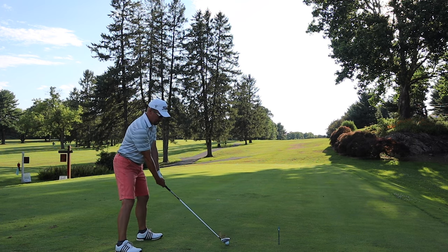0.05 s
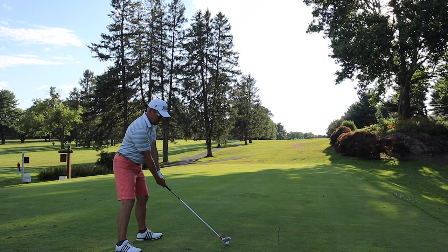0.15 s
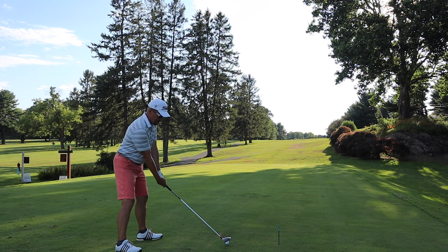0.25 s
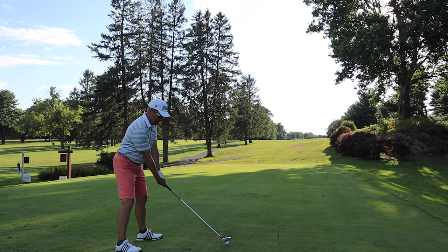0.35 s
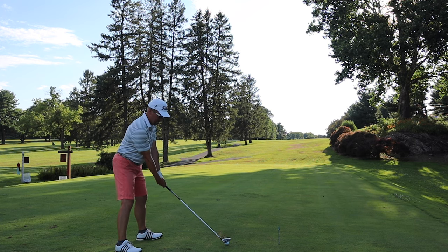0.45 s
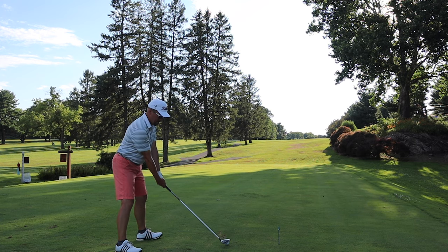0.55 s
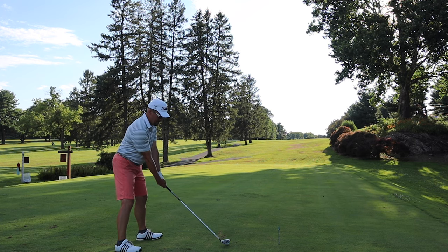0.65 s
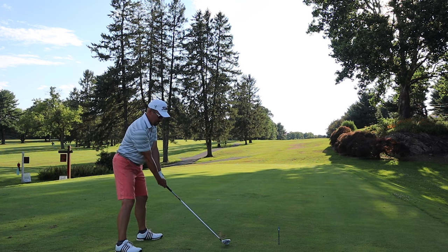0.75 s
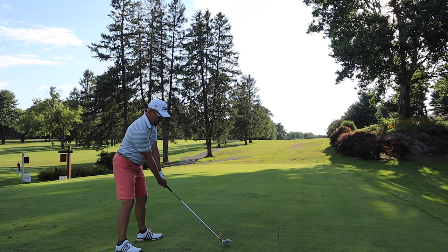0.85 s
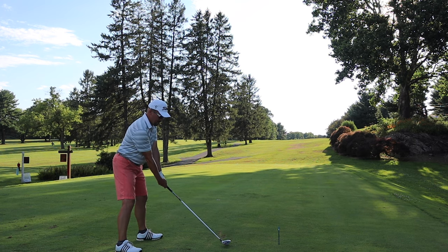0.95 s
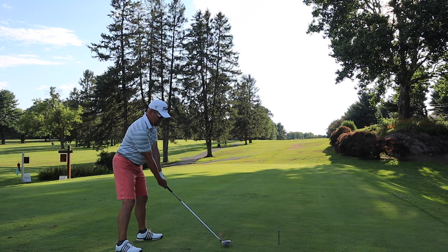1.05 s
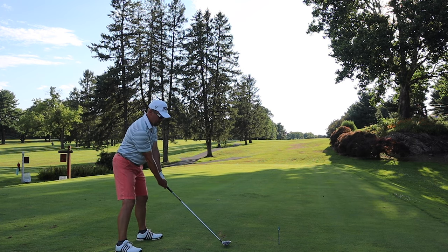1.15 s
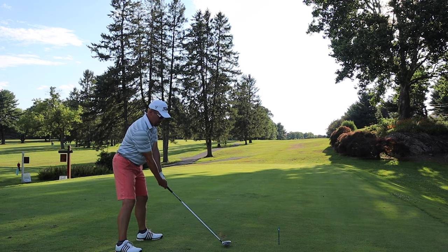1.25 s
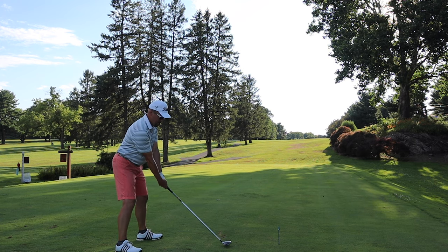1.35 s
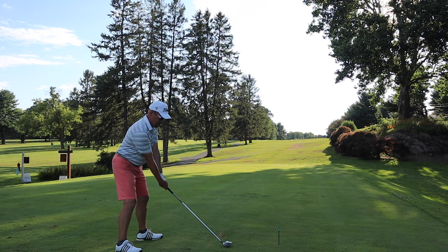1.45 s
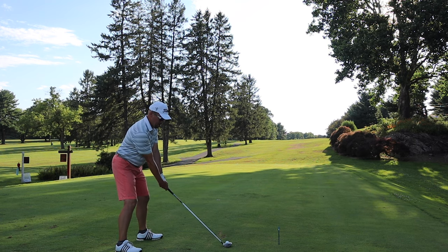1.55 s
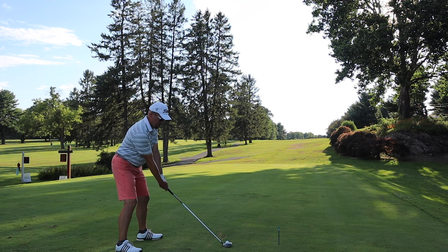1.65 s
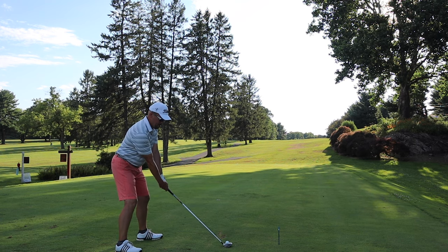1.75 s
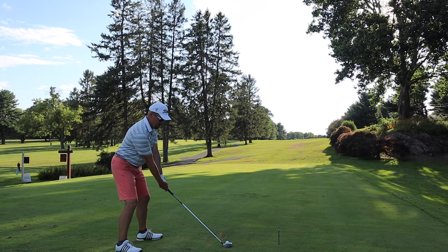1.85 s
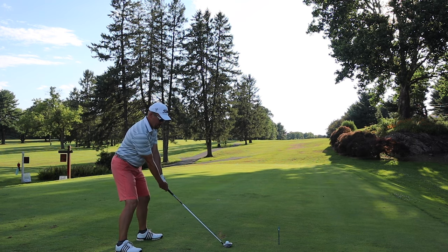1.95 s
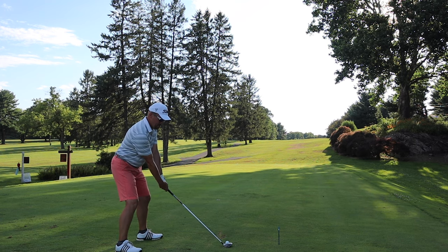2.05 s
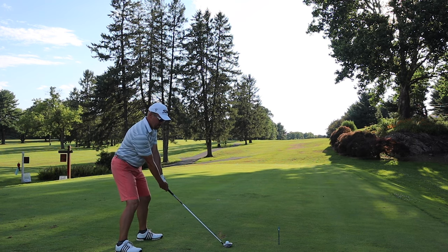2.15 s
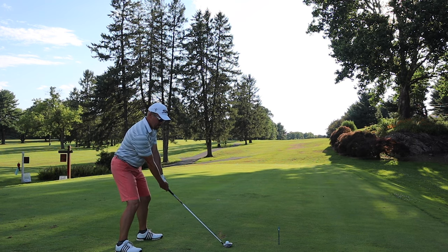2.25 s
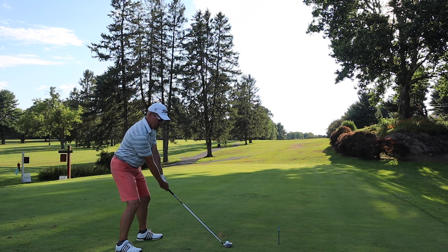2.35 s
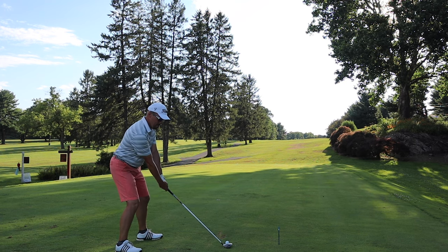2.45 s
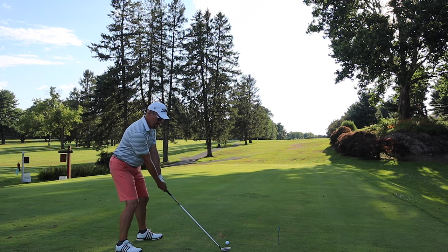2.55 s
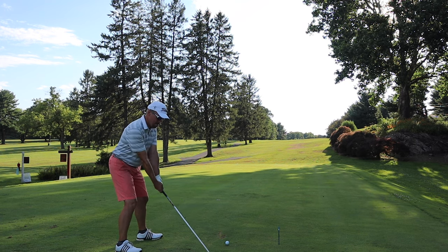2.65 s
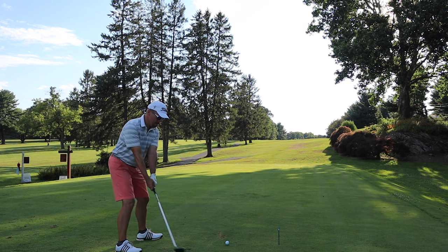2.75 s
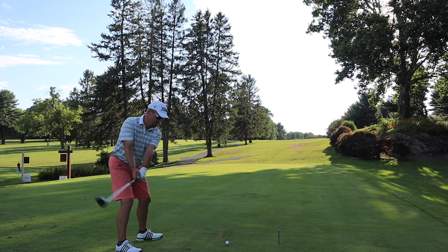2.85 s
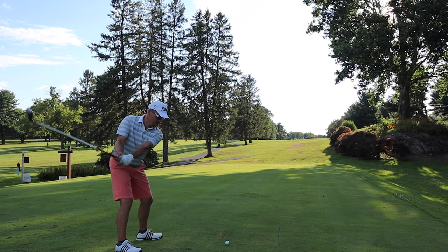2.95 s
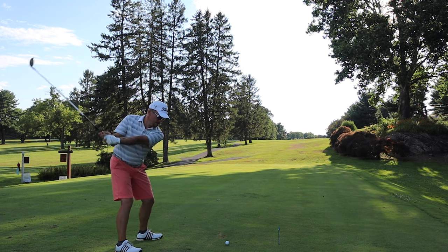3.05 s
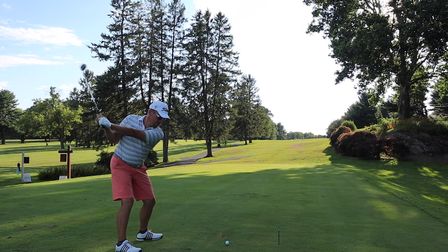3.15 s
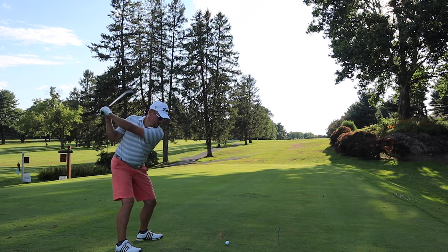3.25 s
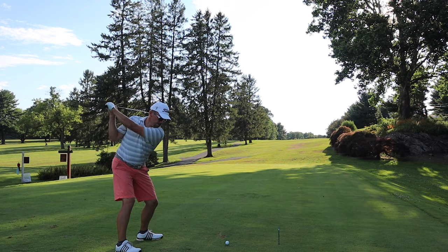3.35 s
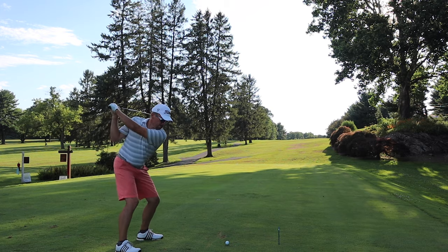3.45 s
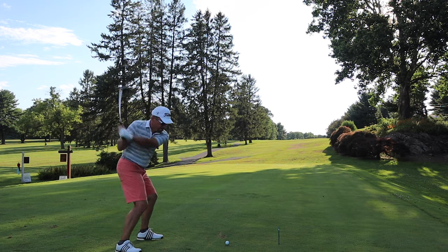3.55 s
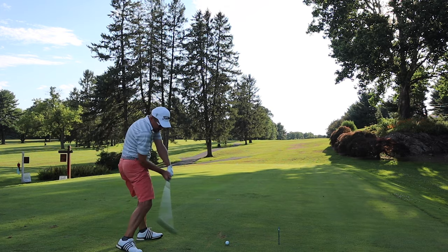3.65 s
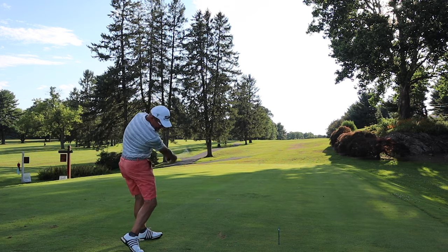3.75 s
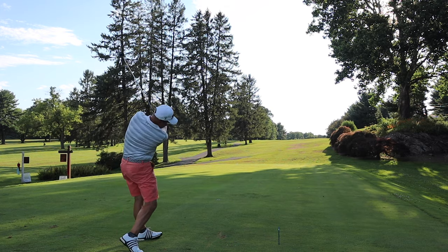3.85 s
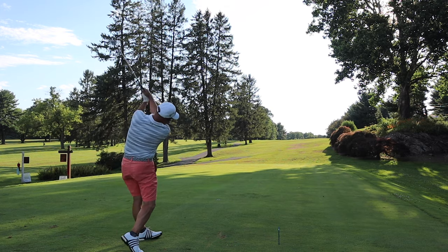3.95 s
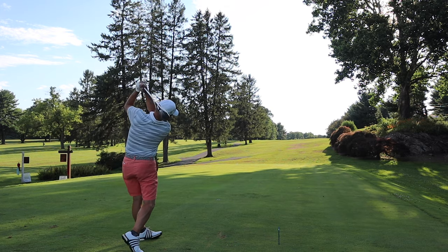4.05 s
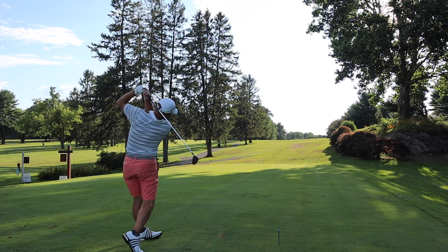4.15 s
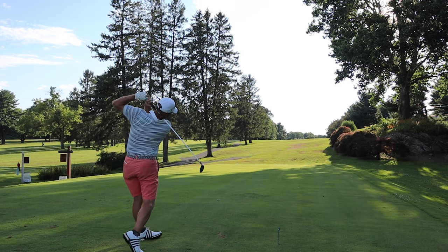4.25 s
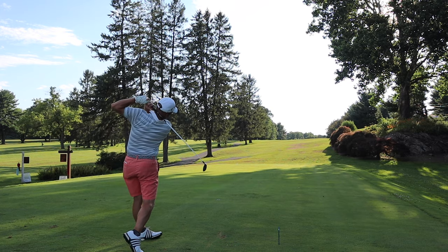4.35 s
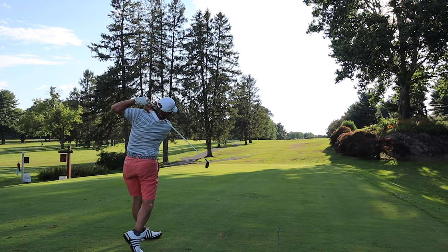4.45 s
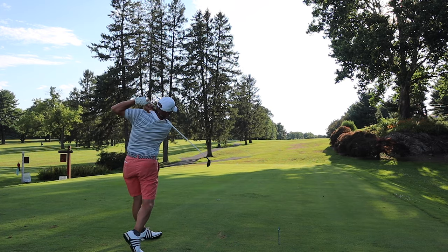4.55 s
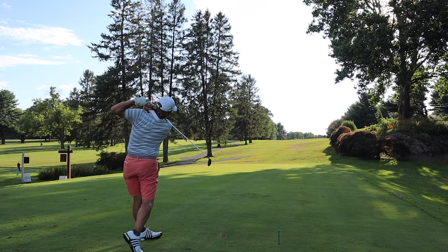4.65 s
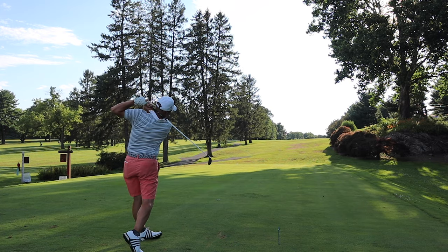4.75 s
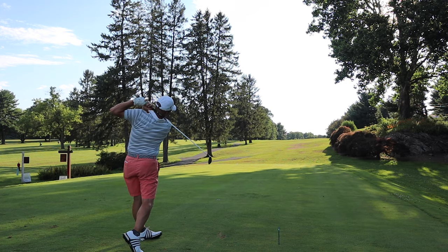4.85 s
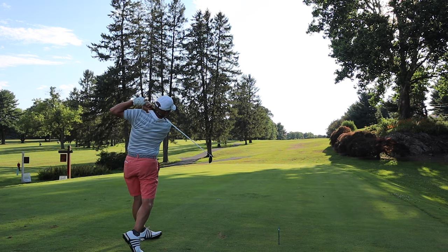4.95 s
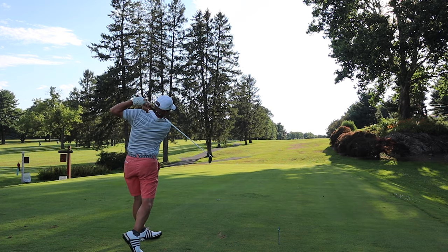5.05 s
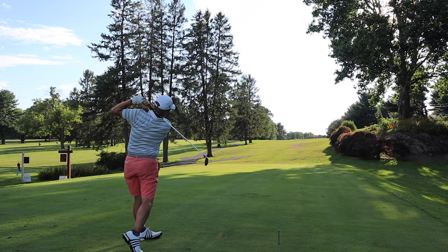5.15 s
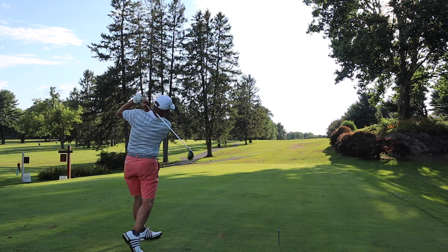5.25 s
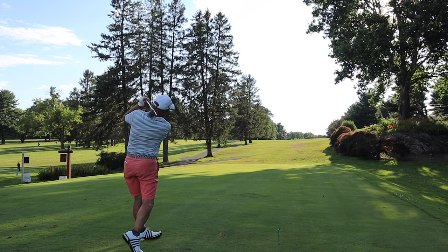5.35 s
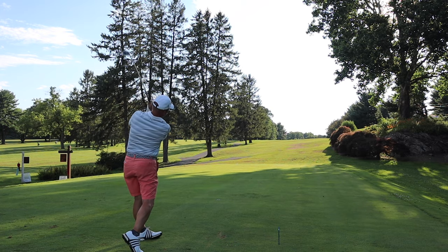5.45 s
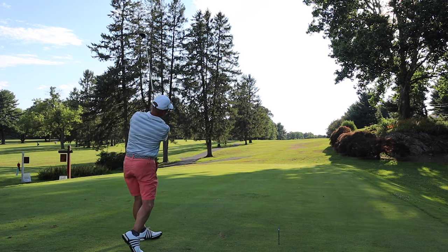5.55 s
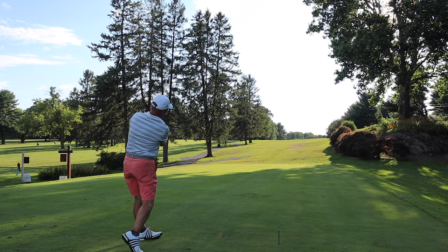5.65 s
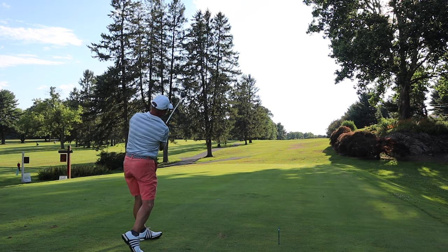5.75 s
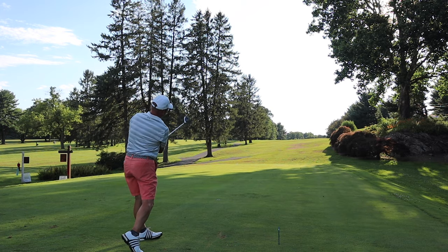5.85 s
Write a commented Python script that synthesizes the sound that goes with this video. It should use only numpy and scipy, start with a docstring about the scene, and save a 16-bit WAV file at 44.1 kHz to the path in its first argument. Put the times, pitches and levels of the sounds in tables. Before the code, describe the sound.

Soft whistling birds over a far low hum, then a quick whoosh and a bright metallic golf drive with a short hissy return from trees.

```python
"""Golf drive among trees

A quiet, tree-lined course, one microphone behind the tee, a golfer driving a ball off it.
The club swishes down as vortex tone, hiss and low wake; its hollow metal head rings against the ball.
Two stands of trees, nearer and farther, throw the crack back as coloured noise.
Small birds sing gliding whistles over a distant hum of traffic made of noise, with one far motor.
A limiter ducks briefly after the blow."""
import sys
import numpy as np
from scipy import signal
from scipy.fft import rfft, irfft
from scipy.io import wavfile
from scipy.ndimage import uniform_filter1d, minimum_filter1d

SR = 44100
rng = np.random.default_rng(int(sys.argv[2]) if len(sys.argv) > 2 else 0)


def store_wav(level_fs):
    """Save 16-bit WAV to argv[1]."""
    pcm = np.round(np.clip(np.atleast_2d(level_fs), -1, 1) * 32767)
    wavfile.write(sys.argv[1], SR, pcm.T.astype(np.int16))


N = 260631
T = np.arange(N) / SR  # time [s]
STRIKE_S = 3.8078  # the club meets the ball


def amp(db):
    """Decibels to gain."""
    return 10 ** (np.asarray(db) / 20)


def evened(x):
    """Scales to rms 1."""
    return x / np.sqrt(np.mean(x ** 2) + 1e-20)


def noise(points):
    """Noise shaped by a spectrum of (frequency [Hz], level [dB]) points; rms 1."""
    hz, db = np.transpose(points)
    log_hz = np.log(np.fft.rfftfreq(N, 1 / SR) + 1)
    gain = amp(np.interp(log_hz, np.log(hz + 1), db))
    return evened(irfft(rfft(rng.standard_normal(N)) * gain, N))


def drift(hz):
    """Slow chance up to about hz; rms 1."""
    gain = np.exp(-(np.fft.rfftfreq(N, 1 / SR) / hz) ** 2)
    return evened(irfft(rfft(rng.standard_normal(N)) * gain, N))


def level(s, db):
    """Gain along a dB curve, silent outside it."""
    return amp(np.interp(T, s, db)) * (T >= s[0]) * (T <= s[-1])


def turn(s, hz):
    """Running phase of a pitch curve."""
    return 2 * np.pi * np.cumsum(np.interp(T, s, hz)) / SR


def dying(s, t60):
    """Exponential decay that starts at s and falls 60 dB in t60 seconds."""
    return (T >= s) * np.exp(-np.log(1000) * np.maximum(T - s, 0) / t60)


def swell(full_s, hold_s, db, rise_db_per_s, fall_db_per_s):
    """Gain that rises to db, holds and falls away."""
    early = np.maximum(full_s - T, 0)
    late = np.maximum(T - full_s - hold_s, 0)
    return amp(db - rise_db_per_s * early - fall_db_per_s * late)


def ring(s, modes, contact, low_cut_hz=135):
    """Modes set ringing at s by a push that lasts contact seconds; small things radiate little bass."""
    start, t = round(s * SR), np.arange(SR // 4) / SR
    tone = np.zeros(len(t))
    for hz, db, t60 in modes:
        tone += amp(db) * np.exp(-np.log(1000) * t / t60) * np.sin(2 * np.pi * hz * t)
    push = np.sin(np.pi / 2 * np.minimum(t / contact, 1)) ** 2
    out = np.zeros(N)
    out[start:start + len(t)] = -tone * push
    return signal.sosfilt(signal.butter(4, low_cut_hz, "highpass", fs=SR, output="sos"), out)


def add(mix, s, sound):
    """Mixes a sound in at s."""
    part = mix[round(s * SR):][:len(sound)]
    part += sound[:len(part)]


# a far motor gathering speed: (time [s], pitch [Hz], level [dB])
FAR_MOTOR = [(1.6, 158, -74), (2.05, 168, -66.5), (2.45, 188, -73), (2.85, 201, -63), (3.15, 207, -67),
             (3.4, 209, -88)]
# spectrum of the far traffic and leaves: (frequency [Hz], level [dB])
AIR_COLOUR = [(15, -69.5), (25, -35), (47, -18), (102, -0.5), (200, -3.5), (255, -9), (291, -9), (361, -12),
              (769, -10), (1820, -17), (2810, -25), (3220, -24.5), (3780, -29), (6850, -32), (15800, -40)]


def distance(air_db=-59.5, swell_db=-0.13):
    """Far traffic and leaves, a gently swelling noise, with one motor tone rising out of the hum."""
    s, hz, db = np.transpose(FAR_MOTOR)
    motor = np.sqrt(2) * level(s, db) * np.sin(turn(s, hz))  # root 2: levels are rms
    motor *= amp(1.5 * drift(11))
    return amp(air_db) * noise(AIR_COLOUR) * amp(swell_db * drift(5)) + motor


def slur(start, top_hz, loudest, db):
    """A whistle that sags ever faster and swells to one accent: start, pitch, gain."""
    length_s, drop, bend = .295, .135, 1.75  # drop: share of the pitch lost; bend: how late the fall comes
    accent_s, accent_db = .055, 10  # half width and height of the accent
    t = np.arange(0, length_s, 1 / SR)
    shape_db = accent_db * (np.exp(-((t - loudest) / accent_s) ** 2) - 1)
    hz = top_hz * (1 - drop * (t / length_s) ** bend)
    return start, hz, amp(db + shape_db) * signal.windows.tukey(len(t), .15)


def chip(start, length, first_hz, last_hz, db, bend=1.5):
    """A quick glide that levels off, under one arch of loudness: start, pitch, gain."""
    u = np.linspace(0, 1, round(length * SR))
    hz = last_hz + (first_hz - last_hz) * (1 - u) ** bend
    return start, hz, amp(db) * np.sin(np.pi * u)


def far_chirps(count=14, low_hz=3000, high_hz=4300, length_s=.06, most_glide=.12, db=-84):
    """Faint far chips scattered in time and pitch; most_glide is a share of the pitch."""
    when, height, glide = rng.random((count, 3)).T
    first_hz = low_hz + (high_hz - low_hz) * height ** 2  # squared: more of them low
    last_hz = first_hz * (1 + most_glide * (2 * glide - 1))
    return [chip(s, length_s, f, g, db) for s, f, g in zip(when * T[-1], first_hz, last_hz)]


# falling whistles of one kind of bird: (start [s], top pitch [Hz], loudest after [s], level [dB])
FALLING_WHISTLES = [(.395, 3510, .145, -70), (.82, 3390, .235, -64), (1.04, 3520, .18, -71),
                    (1.43, 3390, .19, -68), (3.97, 3500, .13, -66.5), (4.8, 3550, .21, -65)]
# short chips and lead-in notes: (start [s], length [s], first pitch [Hz], last pitch [Hz], level [dB])
SHORT_CHIPS = [(.035, .06, 4800, 4690, -79), (.495, .03, 6720, 6830, -73), (.572, .022, 6400, 6900, -71),
               (.615, .06, 4450, 4200, -76), (.67, .06, 4040, 4000, -79), (1.469, .019, 5100, 6480, -62),
               (1.483, .016, 7380, 7430, -65), (1.59, .06, 4850, 4780, -82), (1.68, .04, 5170, 5000, -81),
               (1.95, .05, 3350, 3650, -70), (2.245, .045, 1850, 2300, -73), (2.62, .045, 2950, 3400, -79),
               (2.95, .055, 3030, 3200, -76), (4.605, .055, 4050, 3660, -79),
               (4.665, .035, 4850, 4540, -80), (4.795, .06, 3480, 3560, -72),
               (5.485, .055, 2570, 2620, -78)]


def birds(waver=0.007, flutter_db=2.5, wet_db=-6.5, t60=0.65):
    """Near-pure gliding whistles, smeared by the foliage they pass through."""
    song, wobble = np.zeros(N), 1 + waver * drift(60)
    notes = [slur(*row) for row in FALLING_WHISTLES] + [chip(*row) for row in SHORT_CHIPS]
    for start, hz, gain in notes + far_chirps():
        wavering_hz = hz * np.interp(start + T[:len(hz)], T, wobble)
        add(song, start, gain * np.sin(2 * np.pi * np.cumsum(wavering_hz) / SR))
    song *= np.sqrt(2) * amp(flutter_db * drift(39))
    foliage = (rng.standard_normal(N) * dying(0.012, t60))[:SR]  # first return after 12 ms
    foliage /= np.linalg.norm(foliage)
    return song + amp(wet_db) * signal.fftconvolve(song, foliage)[:N]


# light ticks of club, shoes and clothes: (time [s], level [dB])
LIGHT_TICKS = [(1.2272, -53), (1.234, -55), (3.2765, -51), (3.5003, -57), (3.7143, -52), (5.5803, -57)]
# spectrum of the ticks: (frequency [Hz], level [dB])
TICK_SPECTRUM = [(500, 8), (2000, -5), (4000, -1), (8000, -6), (12000, -22), (16000, -16)]
# soft knocks as the golfer settles: (time [s], level [dB])
SOFT_KNOCKS = [(1.2276, -45), (1.2335, -44), (1.2475, -52)]
# what the knocks ring with: (frequency [Hz], level [dB], t60 [s])
KNOCK_RING = [(280, -9, 0.083), (341, -5.5, .085), (405, 2.5, .08), (542, -3.5, 0.052), (775, -9, 0.042),
              (1060, -4.5, 0.039), (1240, -14, 0.027)]


def stance(tick_t60=0.016):
    """Small sounds of the golfer by the tee: dry noise ticks and dull ringing knocks."""
    tick_gain = sum(amp(db) * dying(s, tick_t60) for s, db in LIGHT_TICKS)
    knocks = sum(amp(db) * ring(s, KNOCK_RING, contact=0.00066) for s, db in SOFT_KNOCKS)
    return tick_gain * noise(TICK_SPECTRUM) + knocks


# the crack thrown back by the nearer and the farther stand of trees:
# (full from [s], hold [s], level [dB], rise [dB/s], fall [dB/s])
NEAR_RETURN = (3.9, .01, -42, 160, 260)
FAR_RETURN = (4.014, .058, -48.5, 430, 175)
# spectra of the near and far returns: (frequency [Hz], level [dB])
NEAR_SPECTRUM = [(1180, -49.5), (2000, -19.5), (2890, -13.5), (3020, -8.5), (3800, -4.5), (4670, -5),
                 (5500, -1), (6870, -2.5), (8150, 2.5), (9430, -6), (10300, -1.5), (11800, -9.5),
                 (15500, -38.5)]
FAR_SPECTRUM = [(1000, -19), (1700, -10.5), (2500, -16), (3500, -5), (4000, 2), (4500, -3.5), (5200, -4),
                (6250, 1.5), (7100, -10), (8500, -1.5), (9400, -10), (9900, -22), (11500, -24),
                (14000, -40)]


def trees(flicker_db=1.5):
    """Countless trunks and branches each return a tiny copy of the crack; the far ones lose more treble."""
    grass = amp(-49) * dying(STRIKE_S, t60=.6)  # thin scatter from close by
    woods = amp(-62) * dying(STRIKE_S, t60=1.9)  # thin scatter from all round
    near = np.hypot(swell(*NEAR_RETURN), grass) * noise(NEAR_SPECTRUM)
    far = np.hypot(swell(*FAR_RETURN), woods) * noise(FAR_SPECTRUM)
    return (near + far) * (T >= STRIKE_S) * amp(flicker_db * drift(120))


# low eddies behind the head, then turbulence round it: (frequency [Hz], level [dB])
WAKE_SPECTRUM = [(60, -39.5), (150, -8), (300, -5.5), (450, 3), (600, -6.5), (1000, -24), (3000, -68.5)]
HISS_SPECTRUM = [(600, -21.5), (1100, 1.5), (1700, -1), (2700, -7.5), (3600, -3), (4800, -6.5), (6300, -15),
                 (7400, -10.5), (8700, -8.5), (9900, -23), (13500, -22.5), (15500, -31)]
# loudness of the shaft and wake, then of the hiss:
# (full from [s], hold [s], level [dB], rise [dB/s], fall [dB/s])
SHAFT_LOUDNESS = (3.759, .046, -28, 790, 1450)
HISS_LOUDNESS = (3.76, .042, -37.8, 760, 1000)


def swish(width_hz=110, steady=.5, skirt_db=-6.0, skirt_hz=220, wake_db=-12.5):
    """The shaft sheds vortices at a pitch that follows its speed; the head adds hiss and a low wake."""
    slow_hz, fast_hz = 450, 765
    fastest_s, swing_width_s = 3.785, .042
    speed = np.exp(-((T - fastest_s) / swing_width_s) ** 2)
    phase = turn(T, slow_hz + (fast_hz - slow_hz) * speed)
    tone = evened((steady + drift(width_hz)) * np.cos(phase) + drift(width_hz) * np.sin(phase))
    # parts of the shaft move at other speeds and spread the pitch
    skirt = evened(drift(skirt_hz) * np.cos(phase) + drift(skirt_hz) * np.sin(phase))
    whoosh = tone + amp(skirt_db) * skirt + amp(wake_db) * noise(WAKE_SPECTRUM)
    return swell(*SHAFT_LOUDNESS) * whoosh + swell(*HISS_LOUDNESS) * noise(HISS_SPECTRUM)


# modes of club head and ball: (frequency [Hz], level [dB], t60 [s])
HEAD_MODES = [(170, -20.5, .015), (273, -11.5, 0.016), (597, -5, 0.0041), (2002, -0.5, 0.0057),
              (2955, -13, .024), (4020, -6, .018), (4250, -8.5, .012), (4490, -7.5, 0.01201),
              (4755, -9, .022), (5175, -23, .033), (7095, -22, .025), (7335, -6, .028), (7720, -15, .022),
              (8090, 2.5, 0.019), (8630, -7.5, .019), (8930, -3, 0.0078), (8880, 5.5, .017),
              (9350, -14.5, 0.011), (9680, -16.5, .016), (10400, -8, 0.0044), (12030, -20.5, 0.013),
              (12410, -14.5, .024), (13310, -14.5, .008), (13900, -6.5, 0.0074), (15100, -12, .006)]
# spectrum of the crack: (frequency [Hz], level [dB])
CRACK_SPECTRUM = [(80, -40.5), (300, -8.5), (850, -4), (1400, -21.5), (2100, -7), (3400, -11.5), (4400, -6),
                  (5600, -16.5), (6700, -14), (8600, -1), (10800, 0), (13000, -4), (15000, -4.5),
                  (15800, -14)]


def strike(crack_db=-10, crack_t60=.008, turf_db=-25, turf_t60=0.0495):
    """Half a millisecond of contact rings the face and crown; ball and tee crack, and the turf scatters it."""
    crack = amp(crack_db) * dying(STRIKE_S, crack_t60)
    turf = amp(turf_db) * dying(STRIKE_S, turf_t60)
    return ring(STRIKE_S, HEAD_MODES, contact=.00055) + (crack + turf) * noise(CRACK_SPECTRUM)


def scene():
    """Everything at one microphone behind the tee."""
    return (distance() + birds() + stance() + trees() + swish() + strike())[None]


def record(dry, ceiling_db=-0.3, recovery_db_per_s=125, edge_hz=15850):
    """A limiter catches the blow and lets the background back up; then the band limit."""
    peak_db = 20 * np.log10(abs(dry[0]) + 1e-9)
    fall_db = T * recovery_db_per_s
    held_db = np.maximum.accumulate(peak_db + fall_db) - fall_db  # peaks that sink steadily
    over_db = np.maximum(held_db - ceiling_db, 0)
    # centred windows [samples] let it look a little ahead
    duck_db = uniform_filter1d(minimum_filter1d(-over_db, size=55), size=55)
    low_pass = signal.firwin(511, edge_hz, window=("kaiser", 9), fs=SR)
    return signal.oaconvolve(dry * amp(duck_db), low_pass[None], "same")


dry = scene()
out = record(dry)
store_wav(out)
```